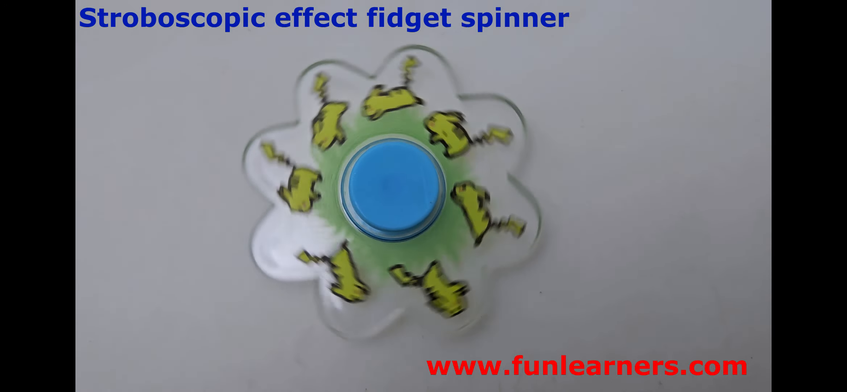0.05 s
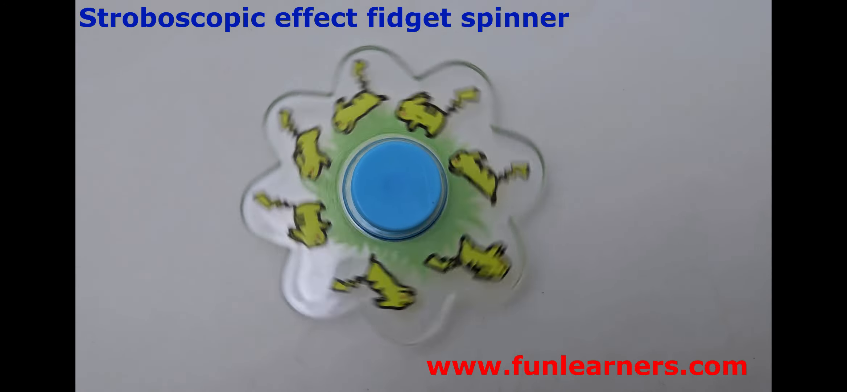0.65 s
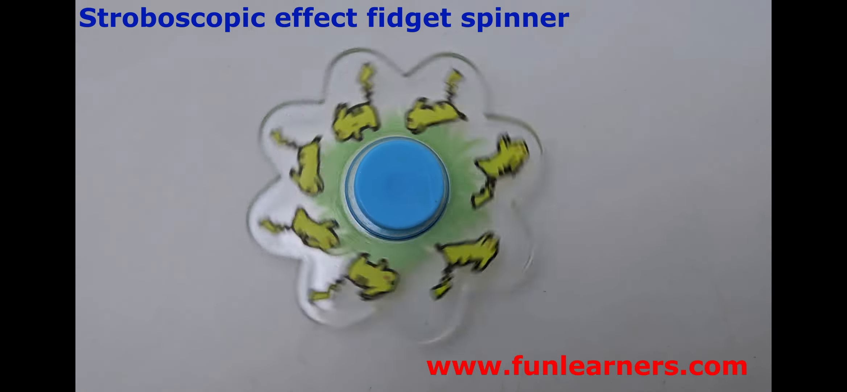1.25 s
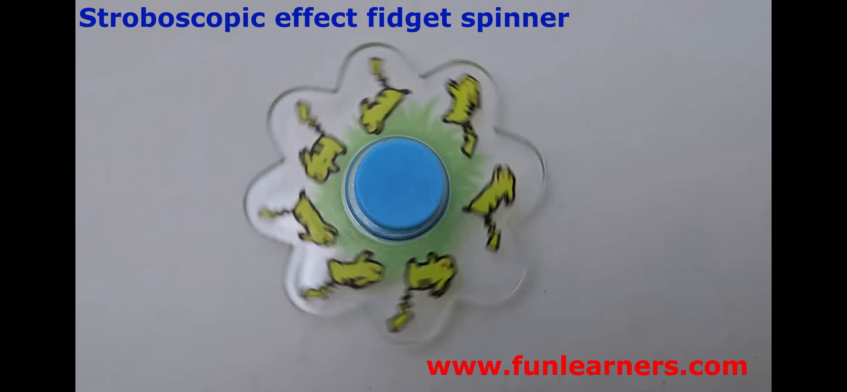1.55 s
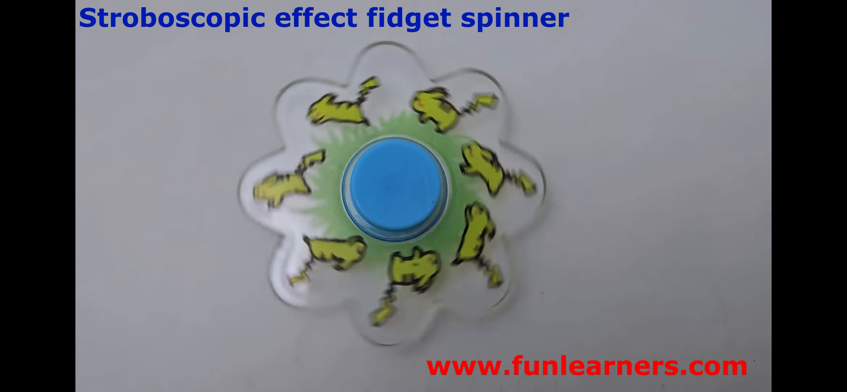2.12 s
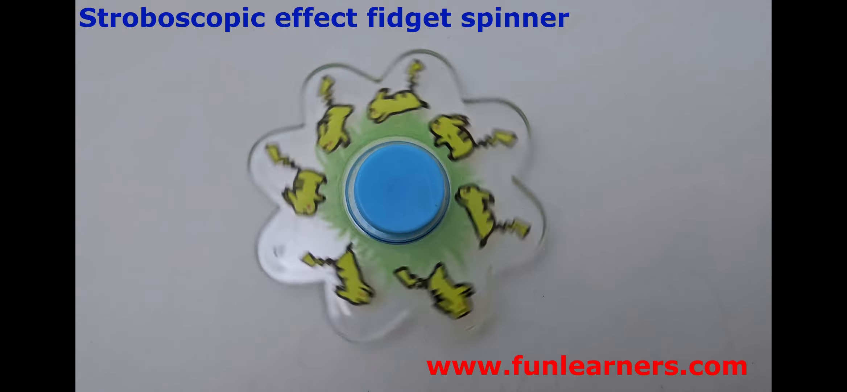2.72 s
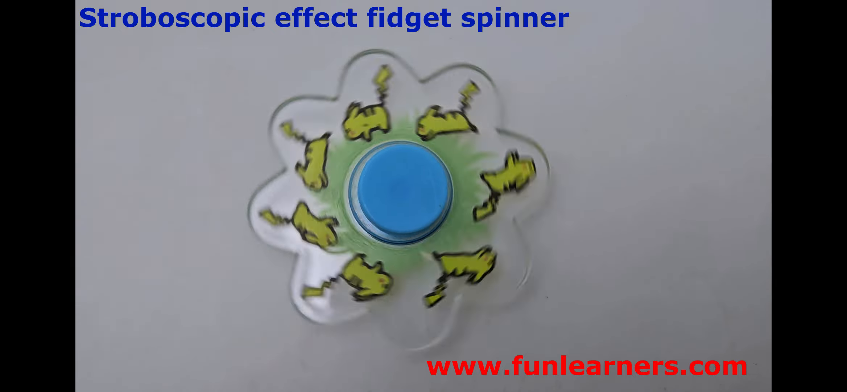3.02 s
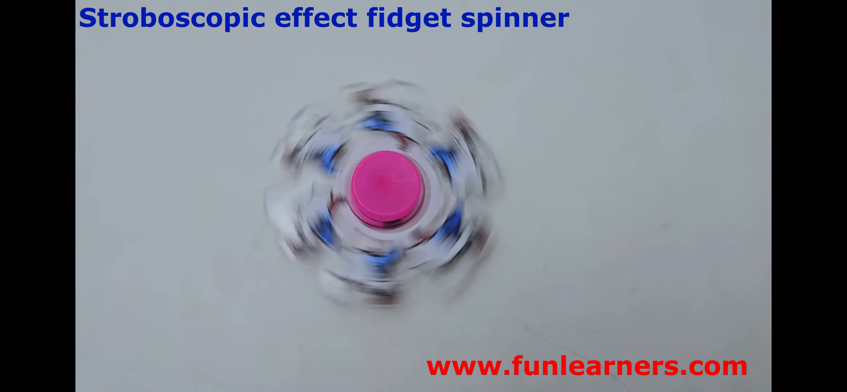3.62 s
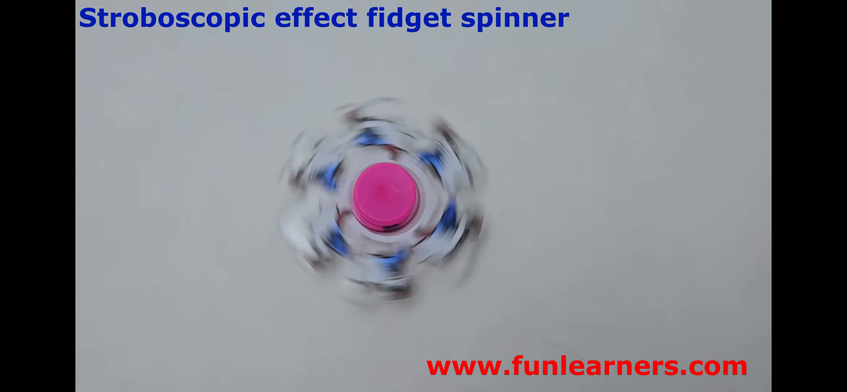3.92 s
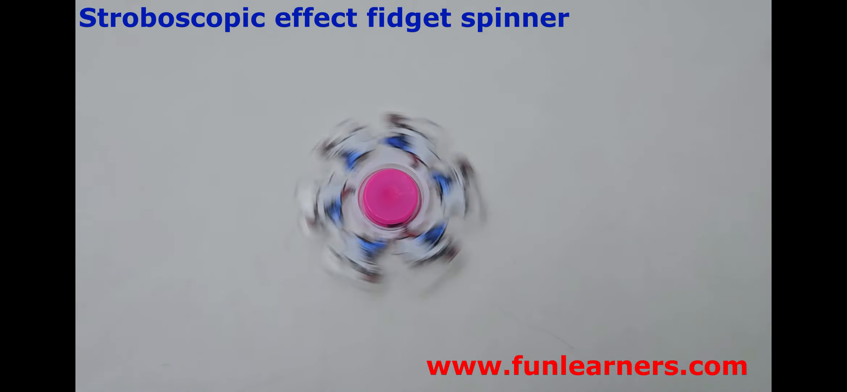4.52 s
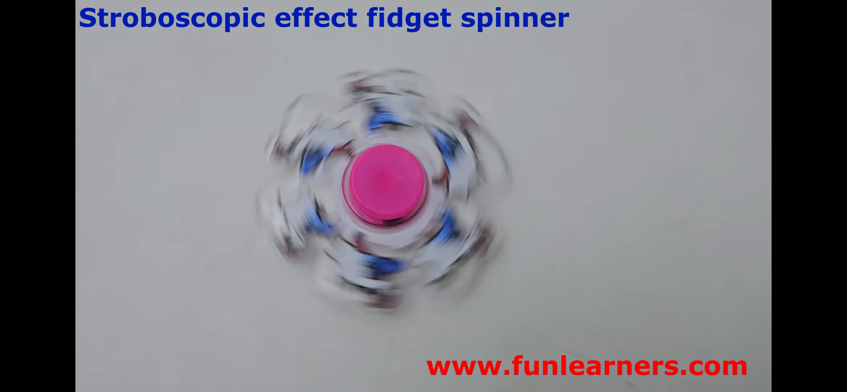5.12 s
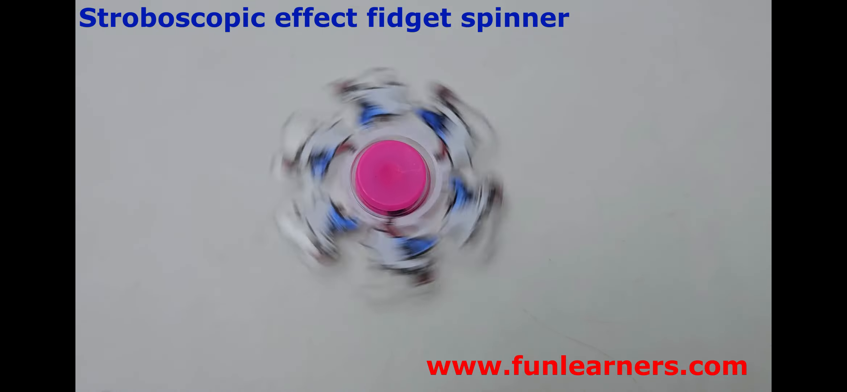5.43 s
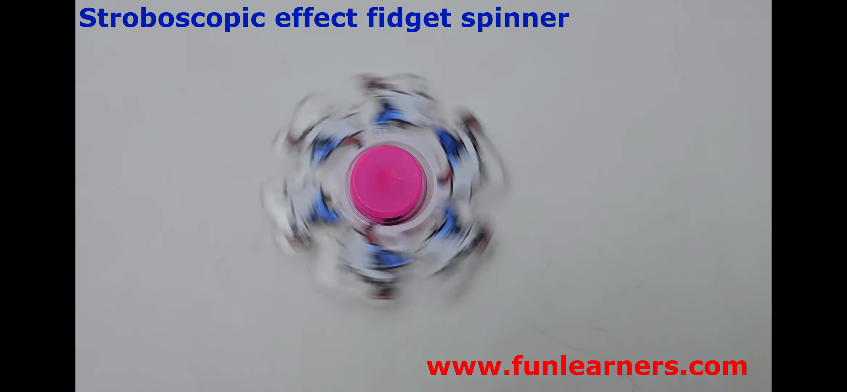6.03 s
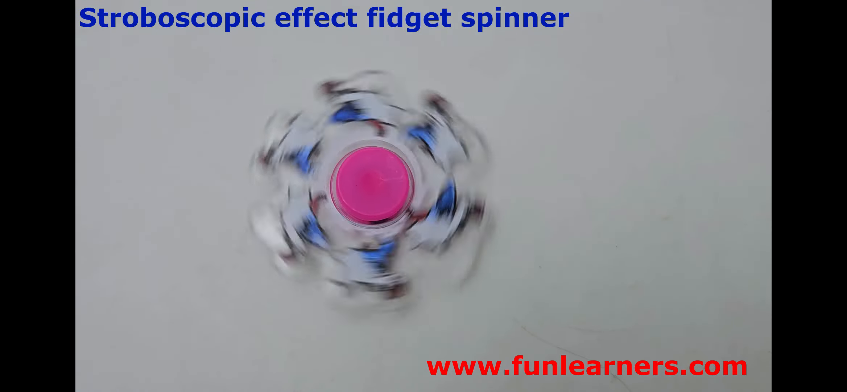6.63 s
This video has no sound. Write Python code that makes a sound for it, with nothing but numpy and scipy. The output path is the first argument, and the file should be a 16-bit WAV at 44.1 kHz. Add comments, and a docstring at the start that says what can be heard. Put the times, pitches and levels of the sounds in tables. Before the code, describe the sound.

A hand spinner turns on a table close to the microphone, its bearing whispering with small, uneven ticks while the tabletop drones softly. After about three seconds and a split-second silence, a second spinner takes over with a much louder, dry hiss and a fine metallic ring. Each fades slightly as it slows. A low motor hum and room rumble lie under both.

```python
"""Two hand spinners on a table.

They run in turn close to a phone, a short silence between, and fade as they slow. The first bearing
whispers and ticks; the second is dry and hisses loudly, and the phone is briefly drawn back from it.
Balls patter on the races and ring the steel; their rolling makes the table top drone.
A motor and the mains hum over room rumble."""
import sys
import numpy as np
from scipy import signal
from scipy.fft import rfft, irfft
from scipy.io import wavfile

SR = 44100
rng = np.random.default_rng(int(sys.argv[2]) if len(sys.argv) > 2 else 0)


def to_wav(s):
    """Save 16-bit WAV."""
    ch = np.atleast_2d(s).T  # columns
    pcm = np.round(np.clip(ch, -1, 1) * 32767)  # PCM
    wavfile.write(sys.argv[1], SR, pcm.astype(np.int16))


N = 302526
TIME_S, FREQ_HZ = np.arange(N) / SR, np.maximum(np.arange(N // 2 + 1) * SR / N, 1)

# balls catching in each bearing: start_s, level_db
QUIET_CATCHES = [(0.052, -39.5), (0.2339, -38), (0.2663, -41), (0.3571, -43), (0.4793, -42),
                 (0.5716, -40.5), (0.6833, -40.5), (0.756, -41), (0.9078, -42), (1.0434, -42),
                 (1.0694, -44), (1.2047, -39), (1.283, -42), (1.4501, -37.5), (1.5597, -39.5),
                 (1.6402, -47), (1.7624, -41), (1.898, -40.5), (1.9914, -45), (2.1264, -44), (2.3002, -45),
                 (2.3471, -45), (2.4892, -45), (2.7033, -40.5), (2.7744, -41.5), (3.0174, -57),
                 (3.095, -40)]
DRY_CATCHES = [(3.368, -24), (3.44, -23), (3.673, -23), (3.77, -24), (3.82, -23), (4.425, -25),
               (4.578, -24), (4.864, -22), (5.541, -22), (5.822, -23), (6.138, -25), (6.538, -23)]
# spectra of the ball impacts and the room rumble: freq_hz, relative_db
QUIET_IMPACT_SPECTRUM = [(1500, -7), (2000, 2.5), (3600, -1), (4600, 1.5), (5600, 3), (7000, -6),
                         (8000, -6.5), (9100, -12.5), (9700, -35), (10800, -14), (11400, -10), (12500, -10),
                         (15200, -12), (15800, -13.5)]
DRY_IMPACT_SPECTRUM = [(1800, -9.5), (2500, -4), (3000, -5), (3600, -0.5), (4250, 0), (4700, 3.5),
                       (6000, 4), (7800, 1.5), (9000, -9), (10000, 0.5), (11000, 3), (13500, -1),
                       (14000, -2), (15600, -5.5)]
RUMBLE_SPECTRUM = [(20, -39), (35, -2.5), (65, -8.5), (92, -1), (115, -4.5), (140, -0.5), (158, -2),
                   (175, 2), (212, -1.5), (235, -13), (330, -13), (500, -24.5), (1500, -27), (4000, -54.5)]
# modes of the quiet bearing and the table under it: pitch_hz, width_hz, relative_db
QUIET_STEEL_MODES = [(6050, 410, -1), (6700, 150, -24), (7240, 190, -11.5), (10300, 150, -22.5),
                     (12000, 370, -23), (13250, 190, -16), (13650, 230, -9), (14900, 260, -21),
                     (15300, 250, -21)]
QUIET_TABLE_MODES = [(413, 71, -1.5), (560, 20, -7.5), (749, 41, 0), (970, 100, -18), (1106, 110, -11.5),
                     (1313, 33, -6.5), (1500, 62, -11.5), (1550, 12, -7), (1750, 430, -43.5),
                     (2030, 80, -21)]
# modes of the dry bearing with its cap, and the table under it:
# pitch_hz, width_hz, level_db, left_minus_right_db, drawn_back_gain_db, gain_over_run_db
DRY_STEEL_MODES = [(4512, 90, -50, -1.5, -3.5, -2.5), (4920, 96, -52.5, -12.5, 2.5, -0.5),
                   (5367, 84, -42, -7, -9, -1.5), (5580, 350, -43, -0.5, 1.5, 1.5),
                   (6255, 180, -45.5, -9, -2, 1), (6500, 200, -47.5, -5, -1, -2.5),
                   (7110, 340, -46, 2.5, -1.5, -4), (8200, 140, -53, -4, -2, -5.0),
                   (8800, 290, -51, 9.5, -2.5, 4), (9390, 130, -49, 10, -0.5, -3),
                   (10860, 83, -45.5, 7.5, -5, -5), (11260, 80, -42, -7.5, 0, 1),
                   (11510, 95, -38.5, -3.5, -5, -2.5), (12050, 430, -48.5, -11, 1, -1),
                   (12900, 210, -46, -2, -1, 0), (13200, 210, -45.5, -0.5, -1.5, 0),
                   (14800, 170.0, -55, 3, 3, -2.0)]
DRY_TABLE_MODES = [(125.6, 25.5, -48.5, 7, 2, 2.5), (144.6, 6.2, -41.5, -0.5, -0.5, 6.5),
                   (178.6, 10.5, -44.5, 2, -2.5, -6.5), (207.4, 18.8, -40.5, 2, 0, -5),
                   (274.5, 31, -47.5, -2.5, -1.5, 4), (369.5, 28, -46.5, 1.5, -1, 2.5),
                   (438.3, 28, -47, -5, -2.5, 3.5), (549.5, 21.6, -46, 0.5, -6, 0.5),
                   (603.7, 15.3, -44, -2.5, -4.5, -7.5), (735, 41, -44.5, 3.5, -0.5, 4),
                   (763.5, 32, -46, 2.5, 5.5, -6), (894, 45, -51, 6.5, 2, -2.5),
                   (1082, 23, -53.5, -2, 5, 2.5), (1129, 28.6, -51, 8, 1, -8), (1252, 59, -54.5, 0.5, 0, 2),
                   (1447, 37, -51, 4, -5.5, -7.5), (1590, 105, -52, -1, 0.5, -2),
                   (1943, 125, -55.5, -3.5, 2.5, -2.5), (2225, 110, -54, -4, 0, -3.5)]
# likeness of the two microphone ports: freq_hz, correlation
PORT_CORRELATION = [(200, 1), (270, 1), (340, 0.19), (400, -0.45), (490, -0.46), (590, 1), (780, 1),
                    (950, 0.41), (1150, 0.44), (1500, -0.29), (4000, 0.77)]

QUIET_END_S, DRY_START_S = 3.142, 3.177
PORT_LAG_S = 0.00013


def undb(db):
    """Decibels to gain."""
    return 10 ** (np.asarray(db) / 20)


def unit(x):
    """Scale to rms 1."""
    return x / np.sqrt(np.mean(x ** 2))


def pan(left_minus_right_db):
    """Left and right gains."""
    return undb(np.array([[left_minus_right_db], [-left_minus_right_db]]) / 2)


def ramp(start_s, length_s):
    """Linear move from 0 to 1."""
    return np.clip((TIME_S - start_s) / length_s, 0, 1)


def walk(rate_hz):
    """Smooth random drift; rms 1."""
    return unit(irfft(rfft(rng.standard_normal(N)) / (1 + (FREQ_HZ / rate_hz) ** 2), N))


def over_freq(points):
    """Join (freq_hz, value) points on a log-frequency axis."""
    hz, value = np.transpose(points)
    return np.interp(np.log(FREQ_HZ), np.log(hz), value)


def colour(x, gain):
    """Minimum-phase filter with this gain curve; output rms 1."""
    cepstrum = irfft(np.log(gain / gain.max() + 1e-5), N)
    cepstrum[1:N // 2] *= 2
    cepstrum[N // 2 + 1:] = 0
    return unit(irfft(rfft(x) * np.exp(rfft(cepstrum)), N))


def mode(x, pitch_hz, width_hz):
    """One steep-skirted resonance; output rms 1."""
    section = np.concatenate(signal.iirpeak(pitch_hz, pitch_hz / width_hz / 2, fs=SR))
    return unit(signal.sosfilt([section, section], x))


def patter(force, rate_hz, spread_db, shared, tail_db, tail_s):
    """Tiny ball impacts, many soft and a few hard, each with a short wash of reflections."""
    hits = rng.random(N) < rate_hz / SR
    sizes = np.minimum(rng.exponential(size=N), 4)
    blows = unit(hits * undb(spread_db * sizes)) * force
    # balls strike all round the race, so the ports hear only part alike
    common, own = rng.choice([-1, 1], N), rng.choice([-1, 1], (2, N))
    direct = blows * (np.sqrt(shared) * common + np.sqrt(1 - shared) * own)
    direct[0] = np.roll(direct[0], round(PORT_LAG_S * SR))
    pole = np.exp(-1 / (tail_s * SR))
    wash = np.sqrt(signal.lfilter([1 - pole], [1, -pole], blows ** 2)) * rng.standard_normal((2, N))
    return (direct + undb(tail_db) * wash) / np.hypot(1, undb(tail_db))


def chatter(catches, rise_s, fall_s):
    """Force envelope of balls that catch, rattle and settle."""
    force, age_s = np.zeros(N), TIME_S[:SR // 8]
    burst = (1 - np.exp(-age_s / rise_s)) * np.exp(-age_s / fall_s)
    for start_s, level_db in catches:
        start = int(start_s * SR)
        force[start:start + len(burst)] += undb(level_db) * burst[:N - start]
    return force


def quiet_bearing(fade_db_per_s=0.66):
    """Smooth bearing: soft patter, uneven rattle and brighter ticks ping the steel."""
    slowing_db = -fade_db_per_s * TIME_S
    load = undb(-51.5 + slowing_db + 1.6 * walk(rate_hz=20))
    soft = patter(load, rate_hz=5000, spread_db=2, shared=0.069, tail_db=2, tail_s=0.0066)
    rattle = undb(-61.5 + slowing_db + 3.4 * walk(rate_hz=35))
    catches = chatter(QUIET_CATCHES, rise_s=0.0028, fall_s=0.0061) * undb(3.5)
    tick_force = np.hypot(rattle, catches)
    ticks = patter(tick_force, rate_hz=4200, spread_db=1.5, shared=0.1, tail_db=-2, tail_s=0.006)
    brightness = undb(over_freq([(2500, -12.5), (6000, 1), (13000, 8)]))  # harder blows are brighter
    impacts = soft + irfft(rfft(ticks) * brightness, N)
    crack = colour(impacts, undb(over_freq(QUIET_IMPACT_SPECTRUM)))
    pings = sum(mode(impacts, pitch_hz, width_hz) * undb(relative_db + 2.6 * walk(rate_hz=32))
                for pitch_hz, width_hz, relative_db in QUIET_STEEL_MODES)
    return crack * undb(-56.5) + pings * undb(-59)


def port_noise():
    """Steady noise as the two microphone ports pick it up."""
    alike = np.clip(over_freq(PORT_CORRELATION), -0.99, 0.99)
    mid, side = rfft(rng.standard_normal((2, N))) * np.sqrt([1 + alike, 1 - alike])
    return irfft([(mid + side) * np.exp(-2j * np.pi * FREQ_HZ * PORT_LAG_S), mid - side], N)


def table_drone(start_db=-48.5, fade_db_per_s=1):
    """The quiet bearing's rolling drives the table top's modes."""
    power = 0
    for pitch_hz, width_hz, relative_db in QUIET_TABLE_MODES:
        detuning = (FREQ_HZ / pitch_hz - pitch_hz / FREQ_HZ) * pitch_hz / width_hz / 2
        power += (undb(relative_db) / (1 + detuning ** 2)) ** 2
    drone = colour(port_noise(), np.sqrt(power))
    return drone * undb(start_db - fade_db_per_s * TIME_S + 1.9 * walk(rate_hz=6.8))


def hum(motor_hz=48.54, mains_hz=50):
    """A motor's shaft tone and its wavering second harmonic, which beats with the mains buzz."""
    phase = 2 * np.pi * motor_hz * TIME_S
    shaft = undb(-40.5 + walk(rate_hz=4.4)) * np.sin(phase)
    harmonic_db = np.where(TIME_S < QUIET_END_S, -40.5, -43.5) + 2.16 * walk(rate_hz=2.7)
    harmonic = undb(harmonic_db) * np.sin(2 * phase + 0.29 * walk(rate_hz=1.7))
    buzz = undb(-54.5) * np.sin(2 * np.pi * 2 * mains_hz * TIME_S)
    return np.sqrt(2) * (shaft + harmonic + buzz)


def room_rumble():
    """Steady low noise of the room."""
    return colour(port_noise(), undb(over_freq(RUMBLE_SPECTRUM))) * undb(-40)


def body(forces, modes, drawn_back, shimmer_db, shimmer_hz):
    """Modes driven from several contact points; each waxes and wanes as the contacts move."""
    run = (TIME_S - DRY_START_S) / (TIME_S[-1] - DRY_START_S) - 0.5  # 0 at mid-run
    sound = 0
    for k, (pitch_hz, width_hz, level_db, pan_db, back_db, run_db) in enumerate(modes):
        moving_db = level_db + back_db * drawn_back + run_db * run + shimmer_db * walk(shimmer_hz)
        sound += mode(forces[k % len(forces)], pitch_hz, width_hz) * undb(moving_db) * pan(pan_db)
    return sound


def dry_bearing(drawn_back, turn_hz=8.3, wobble_db=1, flicker_db=0.93, fade_db_per_s=0.77):
    """Dense hard impacts hiss and ring the steel; the ball load wavers and swings once a turn."""
    phase = 2 * np.pi * np.cumsum(turn_hz * (1 + 0.028 * walk(rate_hz=1.1))) / SR
    load = undb(wobble_db * np.sin(phase) + flicker_db * walk(rate_hz=78))
    catches = chatter(DRY_CATCHES, rise_s=0.002, fall_s=0.006) * undb(29)
    force = np.hypot(load, catches)
    contacts = [patter(force, rate_hz=4000, spread_db=2.5, shared=0.28, tail_db=7, tail_s=0.0031)
                for _ in range(4)]
    crack = colour(contacts[0], undb(over_freq(DRY_IMPACT_SPECTRUM)))
    rings = body(contacts[1:], DRY_STEEL_MODES, drawn_back, shimmer_db=2, shimmer_hz=16)
    slowing_db = -fade_db_per_s * (TIME_S - DRY_START_S)
    return (crack * undb(-37.8) + rings * undb(0.55)) * undb(slowing_db)


def table_shake(drawn_back, gain_db=0.28, fade_db_per_s=0.3):
    """The dry bearing's rough rolling shakes the table."""
    rolling = [port_noise() for _ in range(3)]
    shake = body(rolling, DRY_TABLE_MODES, drawn_back, shimmer_db=1.5, shimmer_hz=17.5)
    return shake * undb(gain_db - fade_db_per_s * (TIME_S - DRY_START_S))


def scene():
    """Quiet spinner, brief silence, dry spinner; hum and rumble under both."""
    edge_s = 0.003
    quiet_gate = 1 - ramp(QUIET_END_S - edge_s / 2, edge_s)
    dry_gate = ramp(DRY_START_S - edge_s / 2, edge_s)
    drawn_back = ramp(start_s=3.62, length_s=0.58) - ramp(start_s=4.53, length_s=0.65)  # 0 = phone close
    quiet_spinner = quiet_bearing() + table_drone()
    dry_spinner = dry_bearing(drawn_back) + table_shake(drawn_back)
    room = (hum() + room_rumble()) * pan(1.3)
    return quiet_gate * (quiet_spinner + room) + dry_gate * (dry_spinner + room)


def record(dry, cutoff_hz=15650):
    """The phone's steep low-pass."""
    return signal.sosfilt(signal.ellip(10, 0.2, 80, cutoff_hz, fs=SR, output="sos"), dry)


dry = scene()
out = record(dry)
to_wav(out)
```